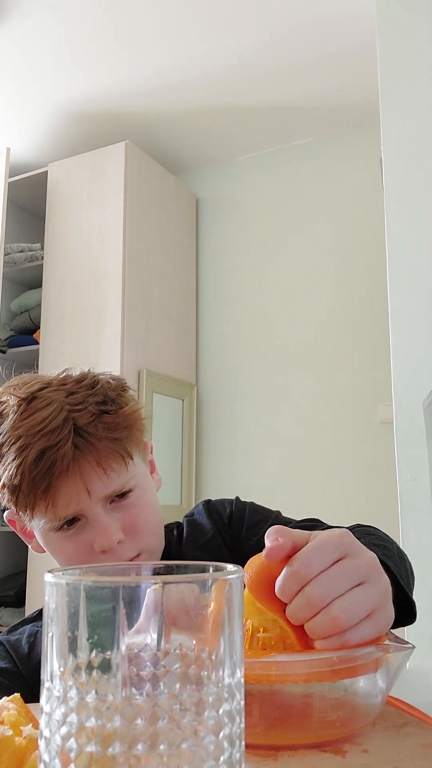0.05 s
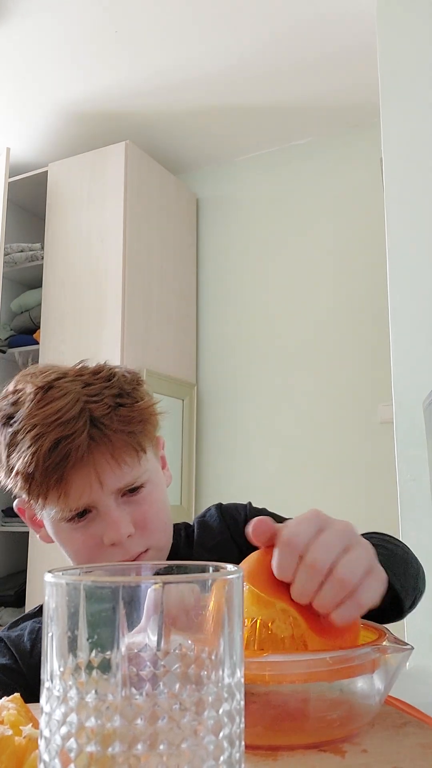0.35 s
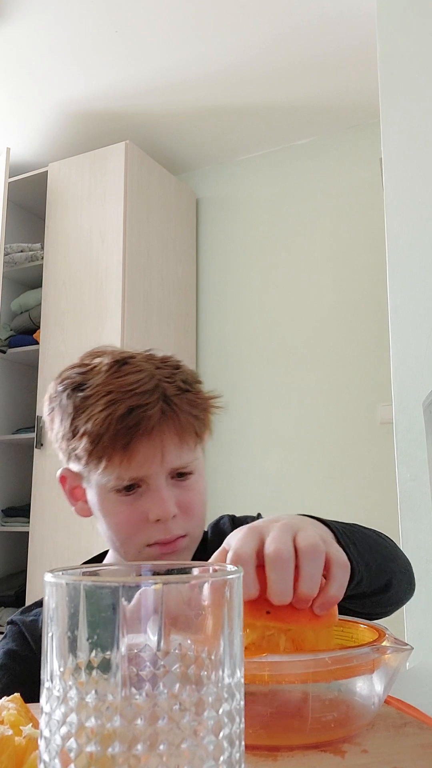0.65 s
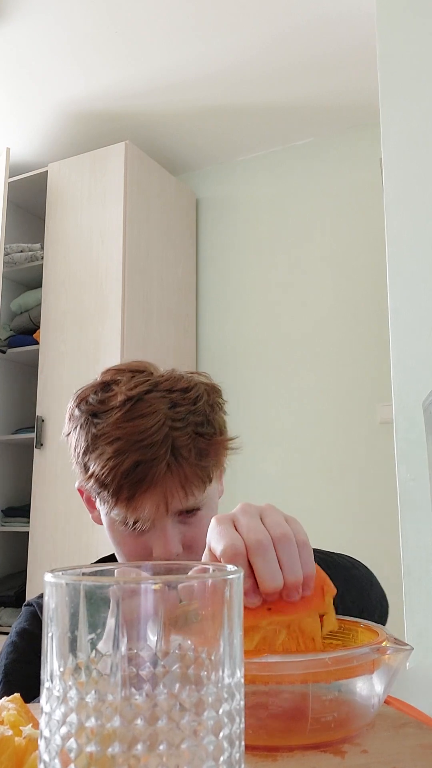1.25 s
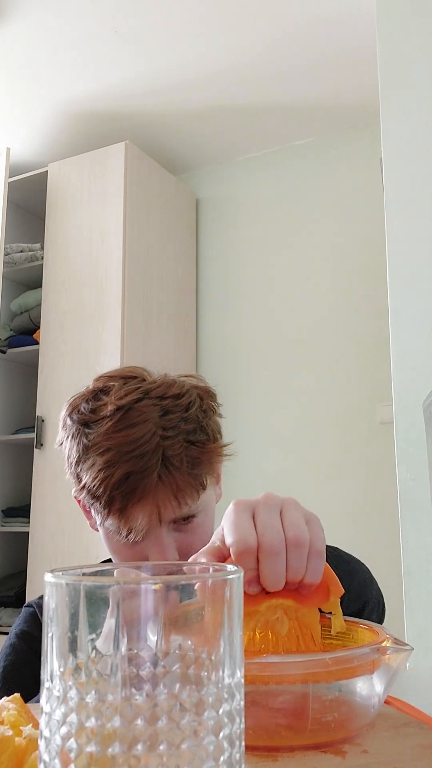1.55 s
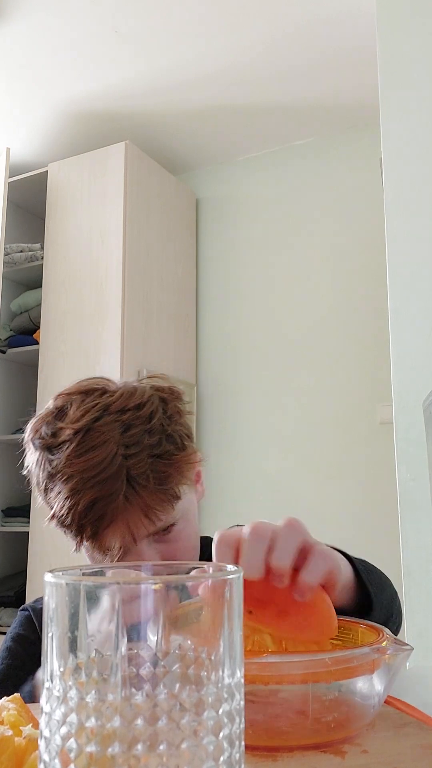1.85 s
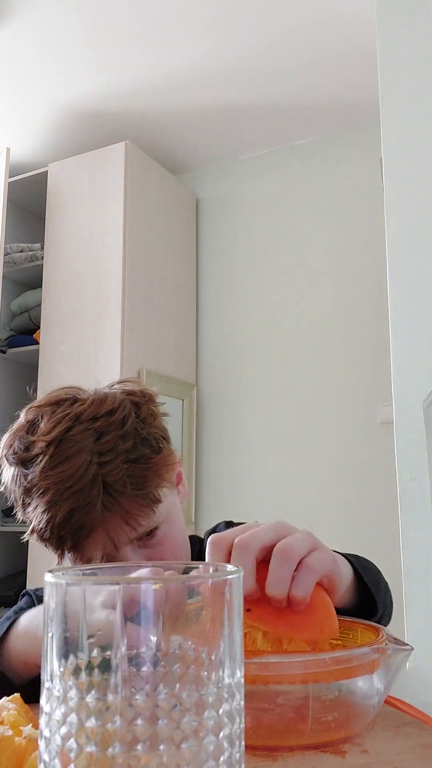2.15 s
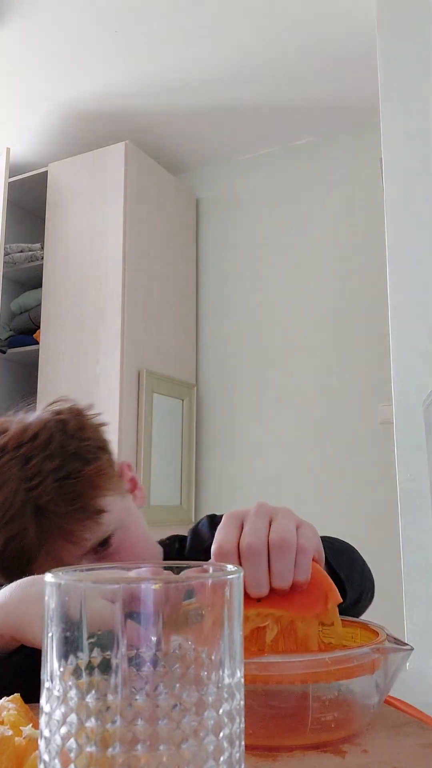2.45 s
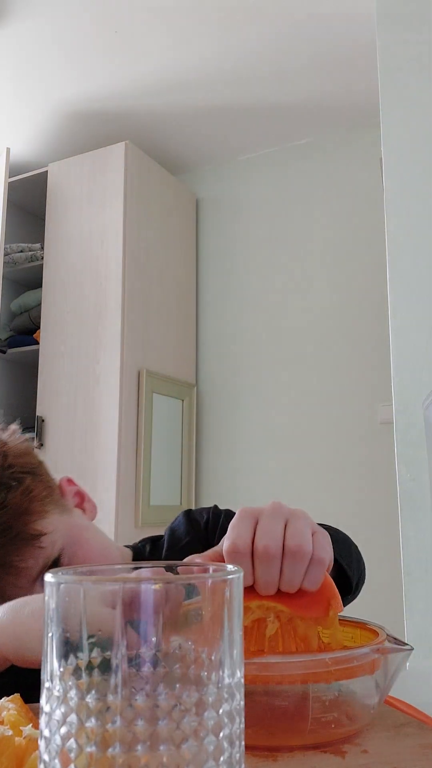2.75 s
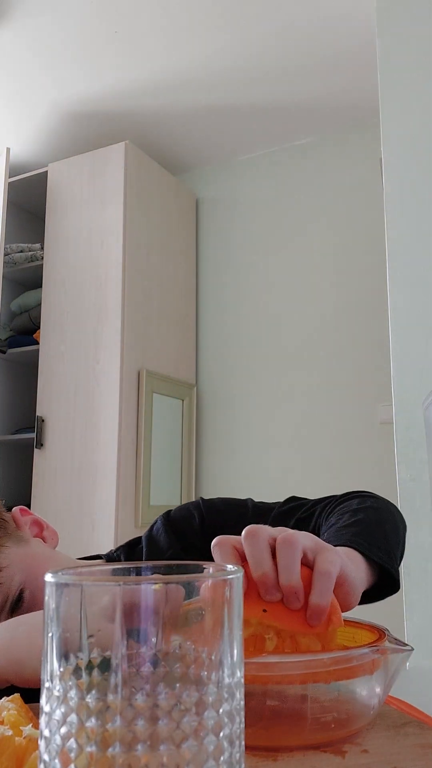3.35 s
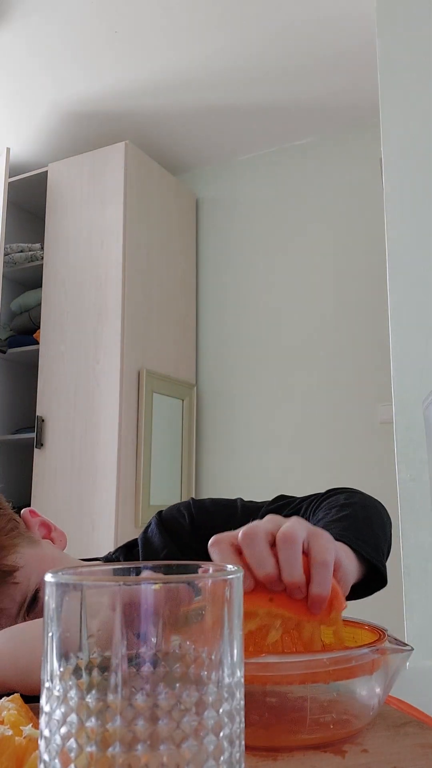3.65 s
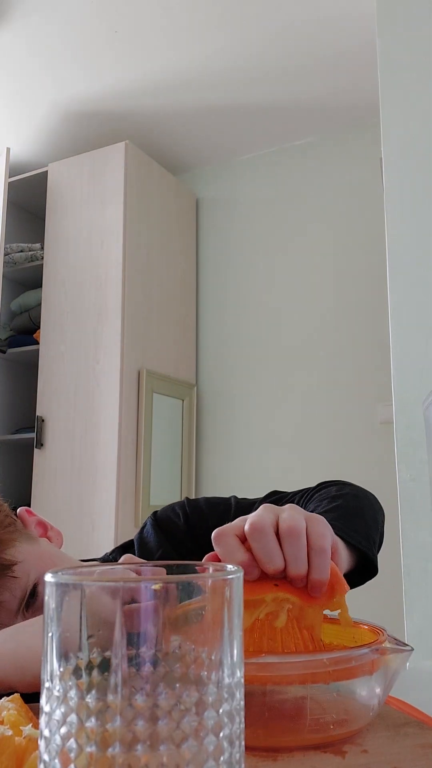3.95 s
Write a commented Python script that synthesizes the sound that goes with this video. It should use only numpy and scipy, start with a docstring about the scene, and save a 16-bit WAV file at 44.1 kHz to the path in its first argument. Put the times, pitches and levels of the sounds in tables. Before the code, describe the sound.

An orange half squelches and scrapes on a plastic hand juicer, close by in a small room. Uneven twists come throughout, stronger at about 0.5, 1, 1.8, 3 and 3.7 seconds, each with crackling pulp and small spits of juice. The plastic knocks lightly and the juicer bumps on the table with a low rumble, most clearly around 1 and 3 seconds. Softer wet rubbing fills the gaps.

```python
"""On a table in a small room, an orange half is pressed and twisted on a plastic hand juicer.
Each twist forces the table into vibration and drags the peel over the ribs of the cone, exciting
the modes of the plastic. Bursting cells make the pulp crackle and tick, and juice spits through
resonant gaps. The strainer knocks on its bowl; the foot bumps on the table and groans by stick-slip."""
import sys
import numpy as np
from scipy import signal
from scipy.fft import rfft, irfft
from scipy.io import wavfile
from scipy.ndimage import uniform_filter1d

SR = 44100
rng = np.random.default_rng(int(sys.argv[2]) if len(sys.argv) > 2 else 0)


def pcm_store(signal):
    """Save signal as 16-bit PCM."""
    levels = np.round(np.clip(np.atleast_2d(signal), -1, 1) * 32767)
    wavfile.write(sys.argv[1], SR, levels.astype(np.int16).T)


N = 176400
TIME, FREQ = np.arange(N) / SR, np.fft.rfftfreq(2 * N, 1 / SR)


def amp(db):
    """Amplitude ratio of a level in decibels."""
    return 10 ** (np.asarray(db) / 20)


def unit(x):
    """Normalisation to an rms of one."""
    return x / np.sqrt(np.mean(x ** 2) + 1e-20)


def curve(points, hz, column=1):
    """Interpolation of a table over logarithmic frequency."""
    points = np.array(points, float)
    return np.interp(np.log(hz + 1), np.log(points[:, 0] + 1), points[:, column])


def add(mix, start_s, sound):
    """Superposition of a sound on the mix."""
    part = mix[max(round(start_s * SR), 0):][:len(sound)]
    part += sound[:len(part)]


def colour(x, db_of_hz, size=2048):
    """Minimum-phase filtering: the gain curve sets the phase through the Hilbert transform."""
    gain_db = np.maximum(db_of_hz(abs(np.fft.fftfreq(size, 1 / SR))), -100)
    response = np.exp(np.conj(signal.hilbert(np.log(amp(gain_db)))))
    taps = np.fft.ifft(response).real
    return signal.fftconvolve(x, taps[:size // 2])[:len(x)]


def ring(x, modes, through=0, detune=1):
    """Modal superposition: damped resonators driven by x, plus a share passed straight through."""
    out = through * x
    clock = np.cumsum(detune * np.ones(len(x))) / SR
    for hz, bandwidth_hz, db in modes:
        phasor = np.exp(2j * np.pi * hz * clock)
        pole = np.exp(-np.pi * bandwidth_hz / SR)
        envelope = signal.lfilter([1 - pole], [1, -pole], x / phasor)
        out = out + amp(db) * 2 * (phasor * envelope).real
    return out


def pops(per_s, spread_db, size=N):
    """A Poisson process of clicks of either sign, mostly small and a few large."""
    occurs = rng.random(size) < per_s / SR
    strength = amp(spread_db * np.minimum(rng.exponential(1, size), 4))
    return occurs * rng.choice([-1., 1.], size) * strength


def steady(x, size=2600):
    """Division by the running rms evens out the strength of the grains."""
    return x / np.sqrt(abs(uniform_filter1d(x ** 2, size)) + 1e-4 * np.mean(x ** 2))


def wander(seconds):
    """Smoothed noise with about the given correlation time."""
    size = int(seconds * SR)
    return unit(uniform_filter1d(uniform_filter1d(rng.standard_normal(N), size), size // 3))


# Spectrum of the room tone: frequency_hz, gain_db
ROOM_TONE_SPECTRUM = [(15, 20.5), (25, -27), (123, -9), (307, -32), (527, -45), (1400, -72), (2590, -58),
                      (7600, -22.5), (15800, -31)]
def room_tone(level_db=-61.5, coherent_below_hz=400):
    """A diffuse noise field is coherent at two microphones only at long wavelengths."""
    left, other = [colour(rng.standard_normal(N), lambda f: curve(ROOM_TONE_SPECTRUM, f), size=8192)
                   for _ in range(2)]
    right = left + colour(other - left, lambda f: -10 * np.log10(1 + (coherent_below_hz / (f + 1)) ** 2))
    return amp(level_db) * np.array([unit(left), unit(right)])


# Reverberation of the small room: frequency_hz, t60_s, reverberant_to_direct_db
REVERBERATION = [(56, 0.083, -10), (300, 0.28, -6), (1500, 0.32, 0.5), (4630, 0.27, 6), (15000, 0.33, -2)]
def room(x, left_lag_s=50e-6, size=24000):
    """Reflection: early echoes from table and glass, then an exponential tail, follow the direct sound."""
    t = np.arange(size) / SR
    echoes = rng.choice([-1., 1.], (2, size)) * (rng.random((2, size)) < 4000 / SR)
    echoes *= (t > .0006) * (1 + 4.3 * np.exp(-t / 0.019))  # early echoes are stronger
    hz, age_s, spectra = signal.stft(echoes, SR, nperseg=256)
    decay = amp(-60 * age_s / curve(REVERBERATION, hz)[:, None])
    tail = signal.istft(spectra * decay, SR, nperseg=256)[1]
    tail = rfft(tail / np.linalg.norm(tail, axis=1, keepdims=True), 2 * N)
    wet = amp(curve(REVERBERATION, FREQ, column=2))
    direct = np.exp(-2j * np.pi * FREQ * np.array([[left_lag_s], [0]]))
    return irfft(rfft(x, 2 * N) * (direct + wet * tail) / np.sqrt(1 + wet ** 2))[:, :N]


def around_cone(x, places=3, hold=440):
    """Path length sets arrival time: juice bursts from changing places, each with its own lag and echoes."""
    place = np.repeat(rng.integers(0, places, N // hold + 1), hold)[:N]
    lags_s = 50e-6 + 70e-6 * np.linspace(-1, 1, places)
    return sum(room(x * uniform_filter1d(1. * (place == k), size=40), lag_s)
               for k, lag_s in enumerate(lags_s))


# Relative levels as the hand presses and twists: time_s, rumble_db, rubbing_db, pulp_db, fizz_db
TWIST_LEVELS = [(0.0, -47.5, -46.5, -54, -63), (0.13, -42.5, -52, -69, -66),
                (0.181, -45.5, -61.5, -68, -77), (0.24, -61.5, -77.5, -88, -74),
                (0.33, -55, -61, -85, -77.5), (0.39, -50, -54, -68, -72.5),
                (0.436, -43.5, -45.5, -56, -60.5), (0.533, -45, -50, -59, -65.5), (0.6, -53, -64, -69, -76),
                (0.68, -54.5, -65, -64.5, -71.5), (0.78, -49.5, -69.5, -72, -77),
                (0.871, -61, -69, -73.5, -71.5), (0.938, -39.5, -61, -52.5, -66),
                (1.003, -38, -43.5, -49, -58), (1.04, -55, -51, -67.5, -70), (1.1, -54, -64, -62, -71),
                (1.251, -65.5, -74.5, -72.5, -76.5), (1.312, -51, -57, -57, -66),
                (1.4, -59, -62.5, -64.5, -67), (1.511, -56.5, -60, -65.5, -71), (1.62, -67, -74, -74, -86),
                (1.709, -49.5, -74.5, -78.5, -67), (1.766, -46.5, -50, -52, -59),
                (1.83, -38, -54, -59.5, -60), (1.909, -49, -61.5, -74, -66), (1.967, -42.5, -50, -51, -65),
                (2.048, -45, -65, -69.5, -72), (2.12, -62.5, -58.5, -65.5, -69.5),
                (2.19, -57, -63, -58, -65), (2.33, -54, -61.5, -61, -64), (2.4, -59.5, -67, -63.5, -69.5),
                (2.55, -49, -59.5, -61.5, -68), (2.65, -52, -63, -72.5, -69), (2.717, -58, -61, -69.5, -71),
                (2.8, -60, -80.5, -92, -74.5), (2.86, -56, -77, -77.5, -67),
                (2.933, -47.5, -51.5, -62.5, -65), (3.017, -39.5, -54.5, -54.5, -65.5),
                (3.1, -43, -65.5, -80, -75.5), (3.2, -58.5, -68, -78, -83),
                (3.251, -47.5, -58, -79.5, -77.5), (3.315, -50, -63, -73, -65),
                (3.37, -48, -56.5, -66, -70), (3.46, -50, -65, -63, -70.5), (3.57, -59.5, -73, -74.5, -76),
                (3.632, -72, -74.5, -69, -76.5), (3.702, -43, -49.5, -60, -60), (3.782, -61, -75, -69, -77),
                (3.88, -58.5, -69.5, -64.5, -72.5), (4.0, -63.5, -75.5, -72, -71)]
def twisting(column):
    """Amplitude modulation: the motion of the hand sets the gain of one layer."""
    points = np.array(TWIST_LEVELS, float)
    return amp(np.interp(TIME, np.sort(points[:, 0]), points[:, column]))


# Resonances of the table: frequency_hz, bandwidth_hz, gain_db
TABLE_MODES = [(54.9, 4.8, 3.5), (72, 15, -1.5), (109.4, 6.6, 3.5), (160.7, 200, -23.5)]
def table_rumble():
    """Forced vibration: the juddering hand drives the low modes of the table."""
    judder = colour(pops(per_s=400, spread_db=2.1), lambda f: -12 * np.log2(1 + (f / 260) ** 2))
    return amp(0.5) * twisting(column=1) * steady(ring(judder, TABLE_MODES))


# Groans of the juicer's foot: start_s, hold_s, relative_level_db, pitch_hz
FOOT_GROANS = [(0.484, 0.04, -37, 119.1), (0.788, 0.057, -47, 111.6), (2.692, 0.063, -41.5, 110.2),
               (3.0, 0.033, -32, 107)]
def foot_groans(rise_s=0.013, size=13000):
    """Stick-slip friction in step with the table gives a low, nearly pure tone."""
    out, t = np.zeros(N), np.arange(size) / SR
    for start_s, hold_s, db, hz in FOOT_GROANS:
        envelope = np.minimum(t / rise_s, 1) * np.exp(-np.maximum(t - hold_s, 0) / hold_s)
        add(out, start_s, amp(db) * envelope * np.sin(2 * np.pi * hz * t))
    return out


# The juicer rocking on the table: start_s, relative_level_db, pitch_hz
FOOT_BUMPS = [(0.432, -37.5, 110.5), (.465, -43, 300), (0.931, -43.5, 119), (0.971, -41.5, 72),
              (1.016, -33, 300), (1.768, -41.5, 101), (1.823, -39.5, 266), (1.942, -37, 297),
              (2.171, -43, 57.2), (2.549, -39, 294), (2.978, -32, 97.4), (3.25, -49.5, 300),
              (3.737, -42.5, 311)]
def foot_bumps(rise_s=0.0013, decay_cycles=1.65, size=13000):
    """Free vibration: the table hums on after a soft, heavy push of the foot."""
    out, t = np.zeros(N), np.arange(size) / SR
    for start_s, db, hz in FOOT_BUMPS:
        envelope = (1 - np.exp(-t / rise_s)) * np.exp(-t * hz / decay_cycles)
        push = envelope * np.sin(2 * np.pi * hz * t)
        push /= abs(push).max()
        hum = amp(3.5) * ring(push, TABLE_MODES)
        add(out, start_s, amp(db + 4) * (push + hum))
    return out


# Resonances of the plastic juicer: frequency_hz, bandwidth_hz, gain_db
JUICER_MODES = [(305.6, 20.8, 7), (444, 27, -8.5), (605, 260, -21.5), (755, 35, -6), (1442, 20, -3),
                (1533, 75, -1.5), (2150, 54, -10), (2740, 120, -11.5), (3000, 86, 0)]
def plastic_shell(force, detune=1):
    """Resonance: the shell radiates mostly at its modes and weakly between them."""
    return ring(force, JUICER_MODES, through=amp(-26.5), detune=detune)


# Knocks of the strainer on its bowl: start_s, relative_level_db, centre_hz
STRAINER_KNOCKS = [(.159, -48, 740), (.385, -51.5, 1540), (0.483, -50, 1500), (0.93, -53, 1600),
                   (0.979, -50, 1590), (1.005, -43.5, 1350), (1.288, -56, 755), (1.305, -49.5, 736),
                   (1.765, -43.5, 1480), (1.936, -43.5, 840), (2.082, -58.5, 1480), (2.545, -42, 500),
                   (2.969, -34.5, 1560), (2.985, -42.5, 850), (3.365, -50.5, 770), (3.503, -58.5, 836),
                   (3.683, -53.5, 824)]
def strainer_knocks(rise_s=0.0041, fall_s=0.0045, half_width_octaves=0.62, size=6000):
    """Impact excitation: a brief chatter of contacts rings the plastic."""
    out, t = np.zeros(N), np.arange(size) / SR
    envelope = np.minimum(t / rise_s, 1) * np.exp(-np.maximum(t - rise_s, 0) / fall_s)
    for start_s, db, hz in STRAINER_KNOCKS:
        def band_db(f):
            offset = np.log2((f + 1) / hz) / half_width_octaves
            return np.maximum(-20 * np.log10(1 + offset ** 4), -40)
        chatter = envelope * pops(per_s=3000, spread_db=0.98, size=size)
        add(out, start_s, amp(db - 12) * unit(plastic_shell(colour(chatter, band_db))))
    return out


def wet_gap(x, hz, half_width_octaves, skirt_db=-19, cutoff_hz=1300):
    """Cavity resonance: a wet gap in the pulp favours one band and passes no bass."""
    def gain_db(f):
        peak = np.exp(-.35 * (np.log2((f + 1) / hz) / half_width_octaves) ** 2)
        bass_loss_db = 10 * np.log10(1 + (cutoff_hz / (f + 1)) ** 6)
        return 20 * np.log10(peak + amp(skirt_db)) - bass_loss_db
    return colour(x, gain_db)


# Bursts of single large juice cells: start_s, relative_level_db, centre_hz, half_width_octaves
CELL_TICKS = [(.468, -44, 9300, 0.25), (0.487, -35, 6500, 3), (0.796, -45, 10000, 0.18),
              (1.269, -53.5, 3000, .9), (1.738, -33, 11000, .35), (2.322, -39.5, 8500, .9),
              (2.366, -41.5, 6500, 1.1), (3.223, -52.5, 5500, 1.5), (3.516, -39.5, 10760, 0.12)]
def cell_ticks(fall_s=0.0028, size=2048):
    """Sudden pressure release: a bursting cell gives a sharp, heavily damped tick."""
    out, t = np.zeros(N), np.arange(size) / SR
    for start_s, db, hz, octaves in CELL_TICKS:
        burst = rng.standard_normal(size) * np.exp(-t / fall_s)
        add(out, start_s, amp(db - 18) * unit(wet_gap(burst, hz, octaves)))
    return out


# Spits of juice: start_s, length_s, relative_level_db, centre_hz, half_width_octaves
JUICE_SQUIRTS = [(0.152, 0.015, -49.5, 7200, 0.39), (0.481, 0.0075, -39.5, 2700, 0.53),
                 (0.987, 0.026, -38.5, 1800, 1.85), (1.28, 0.029, -51, 13100, 0.25),
                 (1.369, 0.02, -48, 5540, 3.6), (1.548, 0.01, -51, 5300, 4.6),
                 (1.726, 0.012, -39.5, 14000, 0.3), (1.935, 0.016, -45, 12840, 0.17),
                 (1.927, 0.026, -48, 4050, 0.5), (2.151, 0.024, -52, 3060, 0.093),
                 (2.229, 0.034, -52.5, 6240, 0.24), (2.461, 0.015, -51, 2670, 0.16),
                 (2.673, 0.03, -48, 4200, 0.36), (2.875, 0.024, -49.5, 6950, 1.05),
                 (2.967, 0.0091, -34.5, 9200, 0.73), (2.997, 0.018, -46.5, 6700, 0.092),
                 (3.355, 0.016, -46, 5460, 0.27), (3.644, 0.024, -36.5, 3200, 0.63),
                 (3.668, 0.02, -35.5, 2420, 0.55)]
def juice_squirts(rise_s=0.009, fall_s=0.0034, size=4096):
    """Source and filter: juice and air sputter through a gap whose size sets the pitch."""
    out, t = np.zeros(N), np.arange(size) / SR
    for start_s, length_s, db, hz, octaves in JUICE_SQUIRTS:
        envelope = np.minimum(t / rise_s, 1) ** 2 * np.exp(-np.maximum(t - length_s, 0) / fall_s)
        sputter = envelope * pops(per_s=2400, spread_db=3.5, size=size)
        spit = unit(wet_gap(sputter, hz, octaves)) * np.sqrt(length_s * SR / size)
        add(out, start_s, amp(db - 5) * spit)
    return out


def bubbles(low_hz, high_hz, per_s, decay_cycles, sizes=16):
    """Damped oscillation: tiny cells and bubbles each give a short rising ping, pitched by size."""
    out, t = np.zeros(N), np.arange(800) / SR
    for hz in np.geomspace(low_hz, high_hz, sizes):
        age = t * hz / decay_cycles
        glide = 1 + 0.0067 * np.minimum(age, 4)
        ping = np.exp(-age) * np.sin(2 * np.pi * hz * t * glide)
        out += signal.oaconvolve(pops(per_s / sizes, spread_db=3.5), ping * hz)[:N]
    return unit(out)


# Spectral shaping of the tearing pulp and of its froth: frequency_hz, gain_db
PULP_SPECTRUM = [(300, -32.5), (700, 4), (1100, -16), (1550, 6), (1800, 4.5), (2200, -6), (2900, 0),
                 (4400, -0.5), (6000, -5), (12000, -39)]
FIZZ_SPECTRUM = [(2000, -30), (4500, -6), (5800, -11.5), (7200, -8), (8600, -17), (11500, -5.5),
                 (13500, -11), (15800, -7.5)]
def pulp_crackle(lurch_db=3.2, lurch_s=0.014):
    """Shot noise: many cells tear and fine froth bursts as the flesh gives way in little lurches."""
    cells = bubbles(857, 6250, per_s=1400, decay_cycles=1.4)
    froth = bubbles(4130, 15750, per_s=3000, decay_cycles=2.2)
    pulp = twisting(column=3) * steady(colour(cells, lambda f: curve(PULP_SPECTRUM, f)))
    fizz = twisting(column=4) * steady(colour(froth, lambda f: curve(FIZZ_SPECTRUM, f)))
    lurches = unit(amp(lurch_db * wander(lurch_s)))
    return (pulp + amp(5.5) * fizz) * lurches


# Spectrum of the friction force on the cone: frequency_hz, gain_db
FRICTION_SPECTRUM = [(60, -25), (150, 2), (250, 5), (800, -1.5), (1200, -0.5), (1700, -17), (3000, -23),
                     (8000, -48)]
def peel_rubbing(grip_bend=0.02, grip_s=0.06):
    """Stick-slip friction: the peel jerks over the ribs, sounding plastic that the shifting grip detunes."""
    slips = colour(pops(per_s=1100, spread_db=4), lambda f: curve(FRICTION_SPECTRUM, f))
    shell = plastic_shell(slips, detune=1 + grip_bend * wander(grip_s))
    return amp(2) * twisting(column=2) * steady(shell)


# Level at the right microphone above the left: frequency_hz, excess_db
RIGHT_EXCESS = [(150, 0.5), (320, 7.5), (750, 6.5), (1400, 10.5), (2500, 4), (5000, 6.5), (12500, 6.5),
                (15500, 16)]
def scene():
    """Level and time cues between two microphones place the juicer close by, to the right."""
    solids = room(table_rumble() + foot_bumps() + foot_groans() + peel_rubbing() + strainer_knocks())
    juice = around_cone(pulp_crackle() + juice_squirts() + cell_ticks())
    right = amp(curve(RIGHT_EXCESS, FREQ))
    sides = np.array([np.ones_like(right), right]) / np.sqrt((1 + right ** 2) / 2)
    return irfft(rfft(solids + juice, 2 * N) * sides)[:, :N] + room_tone()


def record(dry, low_hz=40, high_hz=15900):
    """Band limiting: the microphone drops the deepest bass, and a low-pass cuts the highest treble."""
    high_pass = signal.butter(4, low_hz, "high", fs=SR, output="sos")
    low_pass = signal.firwin(511, high_hz, window=("kaiser", 9), fs=SR)
    return signal.oaconvolve(signal.sosfilt(high_pass, dry), low_pass[None], "same")


dry = scene()
out = record(dry)
pcm_store(out)
```